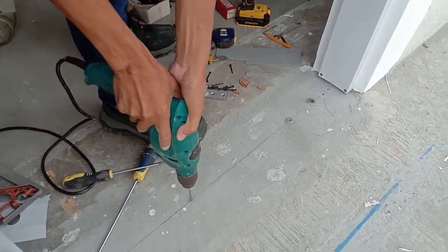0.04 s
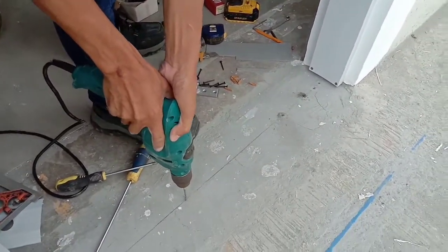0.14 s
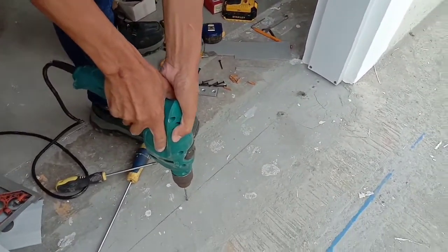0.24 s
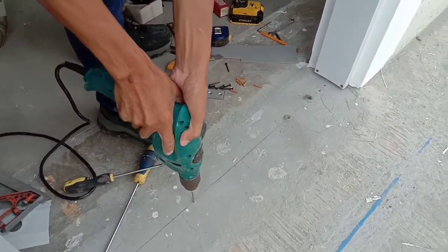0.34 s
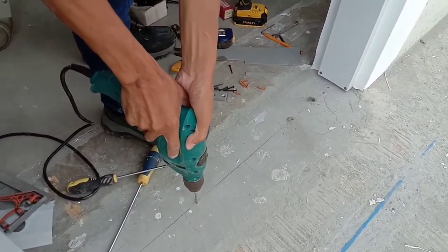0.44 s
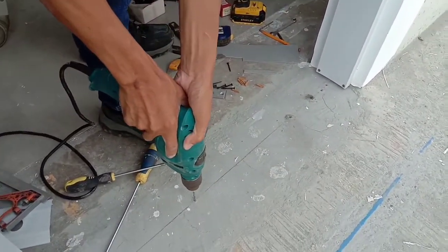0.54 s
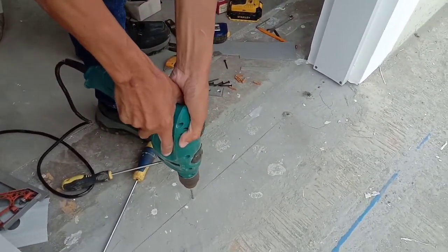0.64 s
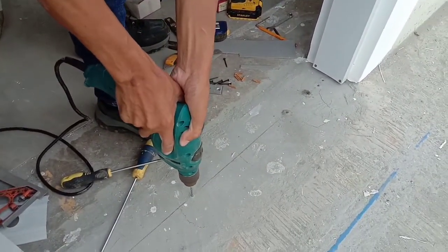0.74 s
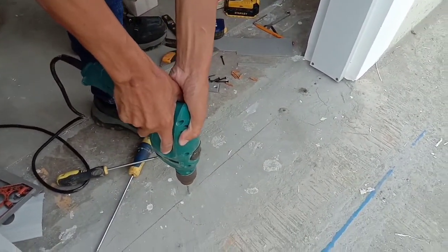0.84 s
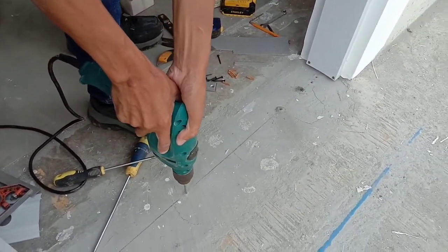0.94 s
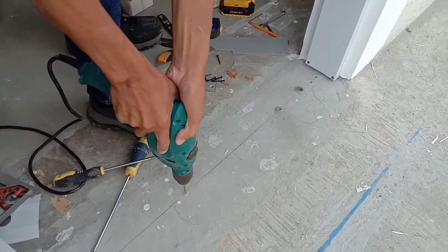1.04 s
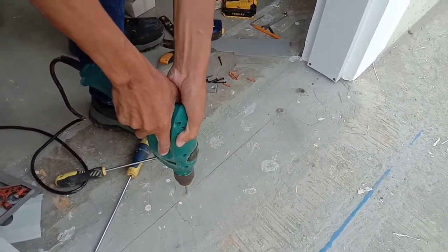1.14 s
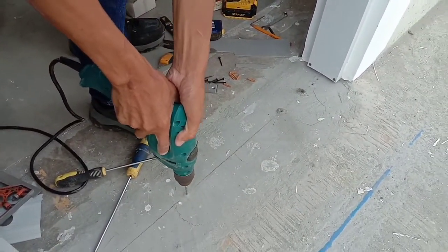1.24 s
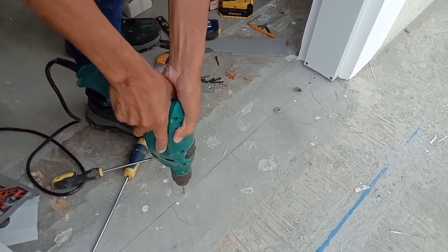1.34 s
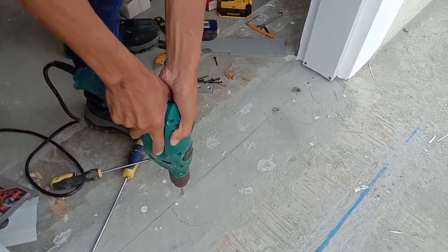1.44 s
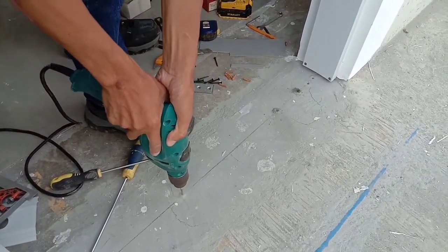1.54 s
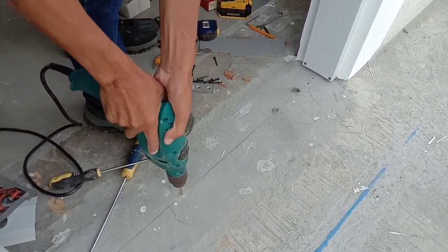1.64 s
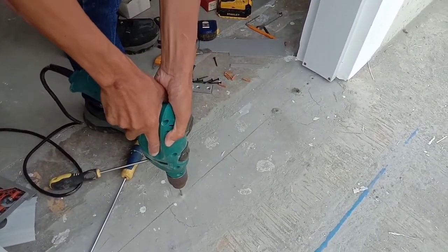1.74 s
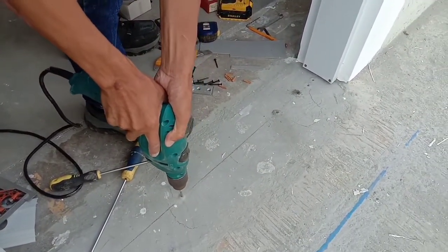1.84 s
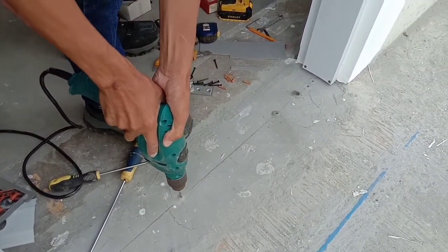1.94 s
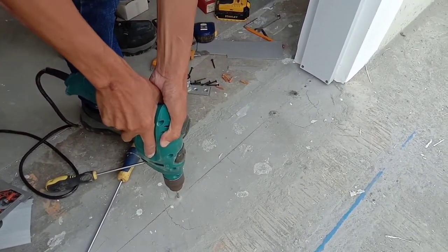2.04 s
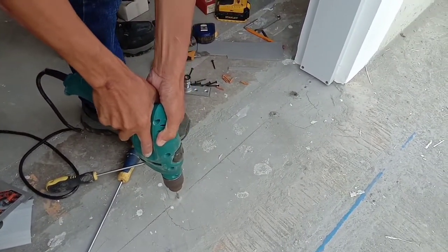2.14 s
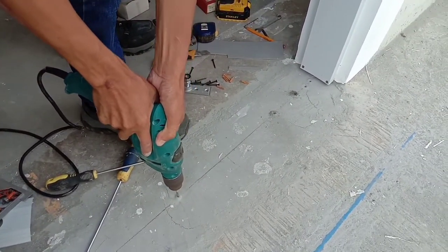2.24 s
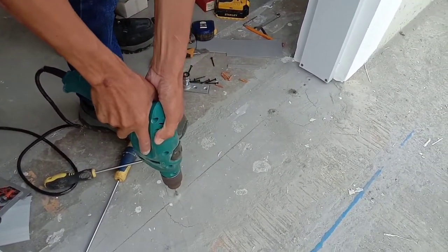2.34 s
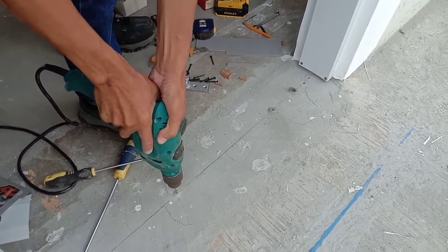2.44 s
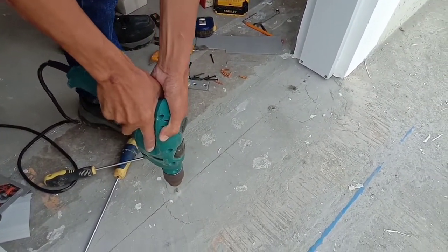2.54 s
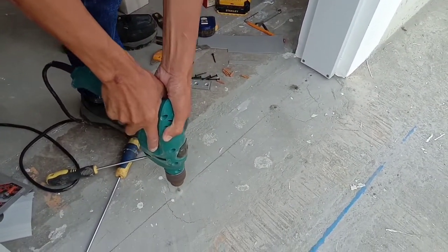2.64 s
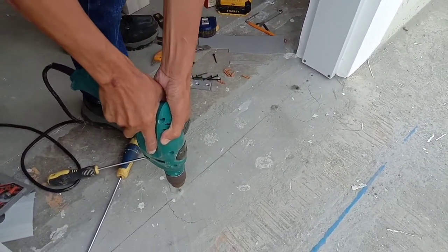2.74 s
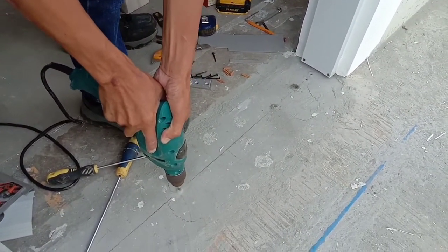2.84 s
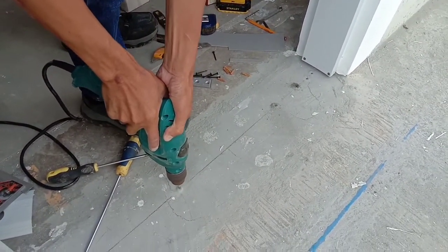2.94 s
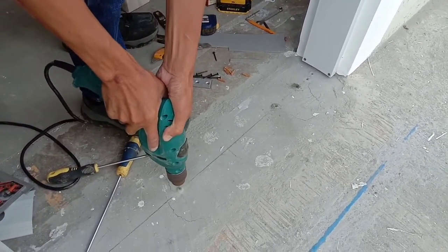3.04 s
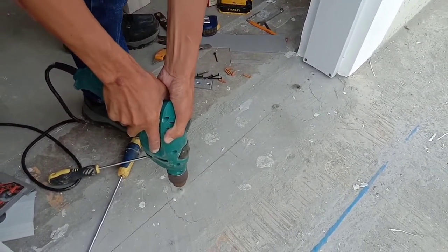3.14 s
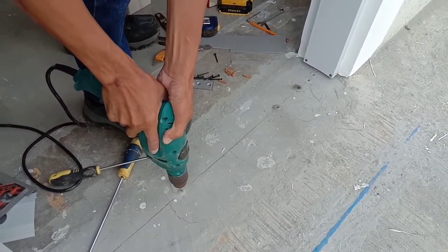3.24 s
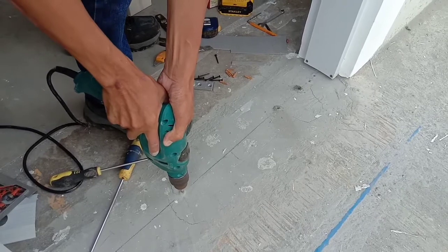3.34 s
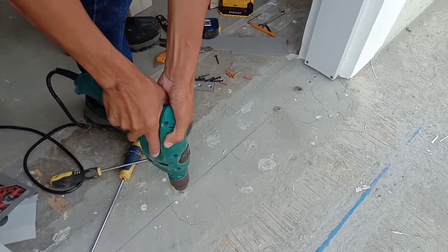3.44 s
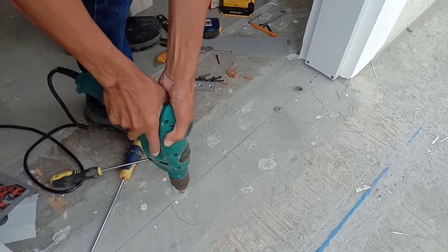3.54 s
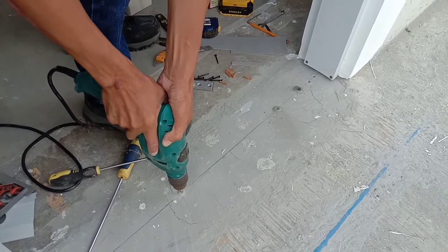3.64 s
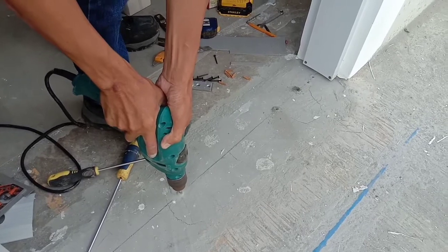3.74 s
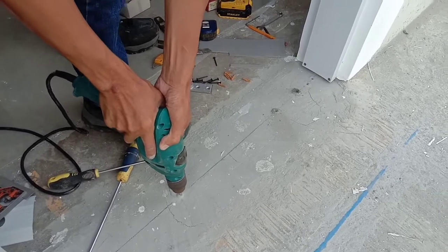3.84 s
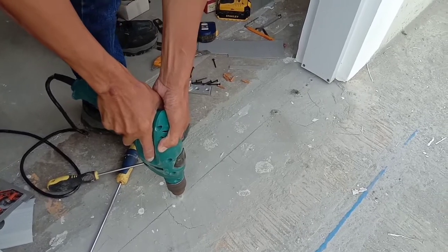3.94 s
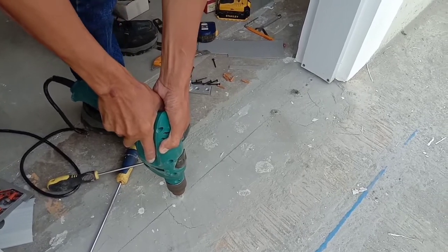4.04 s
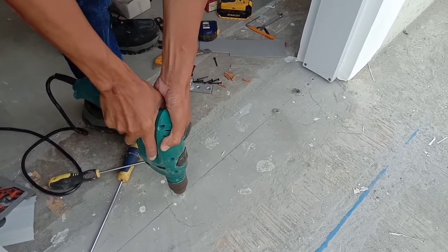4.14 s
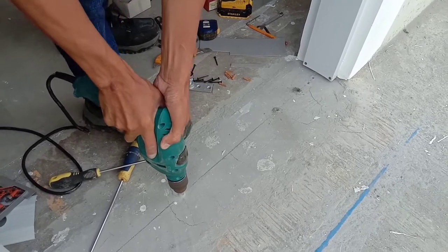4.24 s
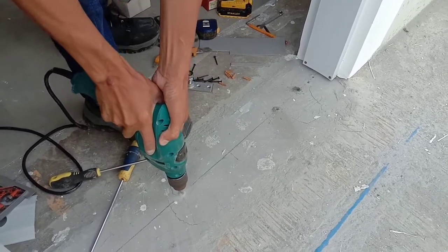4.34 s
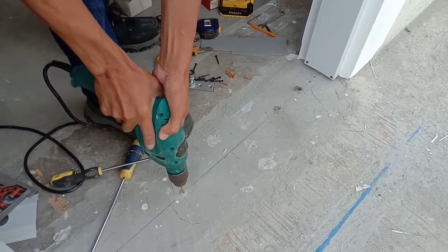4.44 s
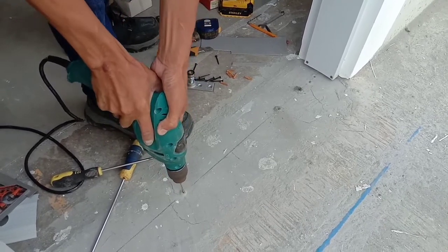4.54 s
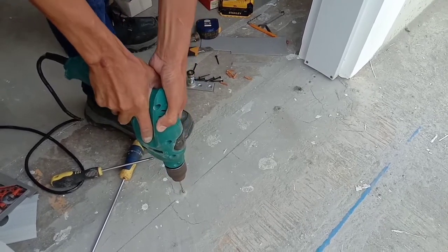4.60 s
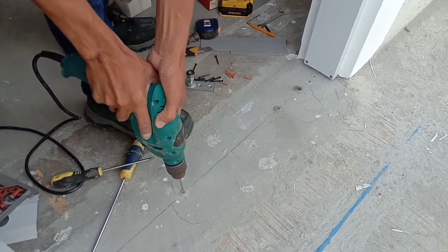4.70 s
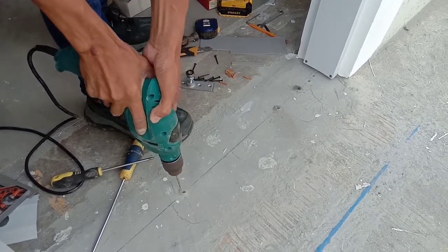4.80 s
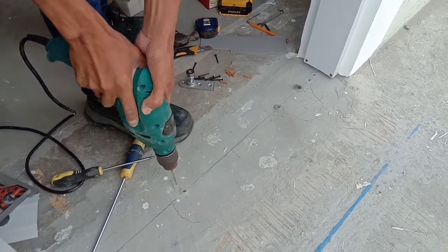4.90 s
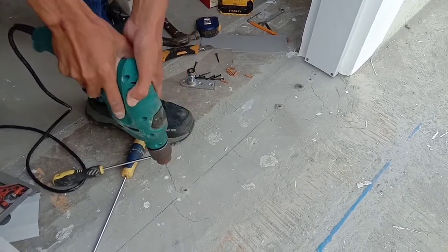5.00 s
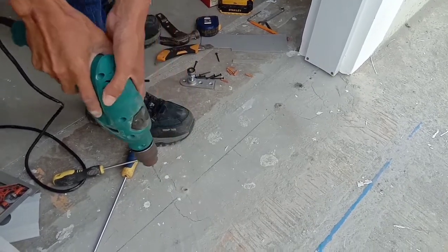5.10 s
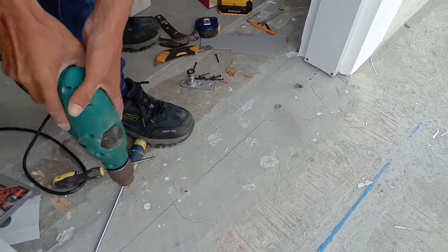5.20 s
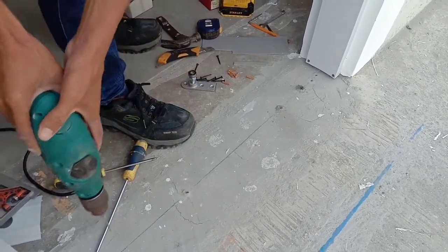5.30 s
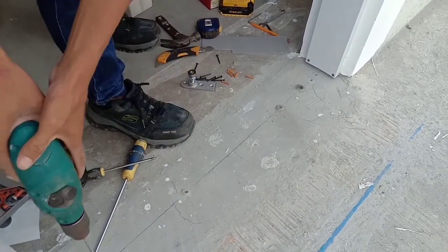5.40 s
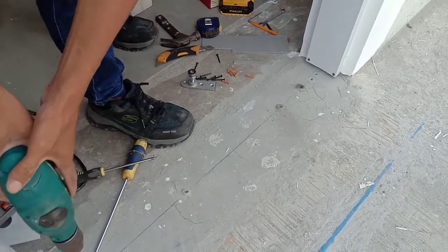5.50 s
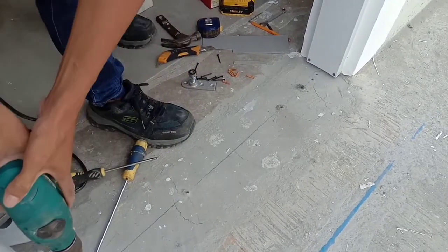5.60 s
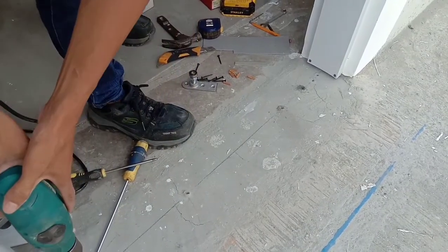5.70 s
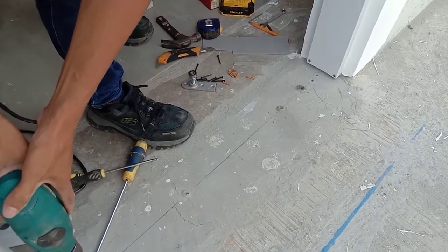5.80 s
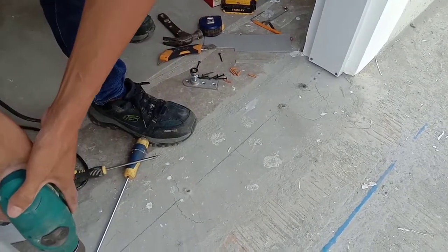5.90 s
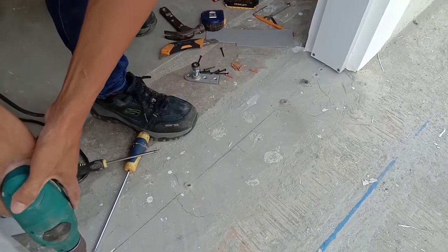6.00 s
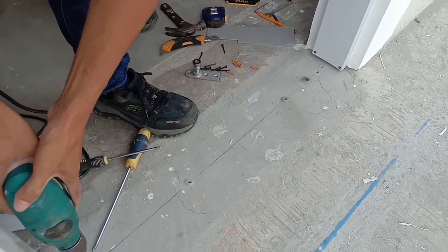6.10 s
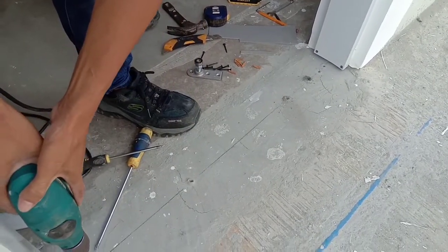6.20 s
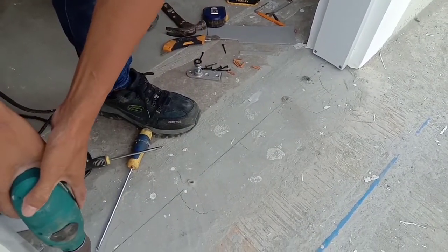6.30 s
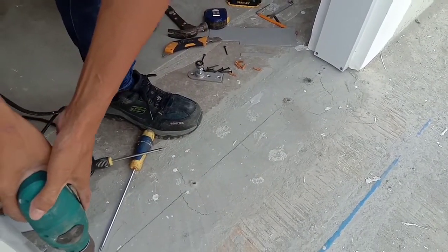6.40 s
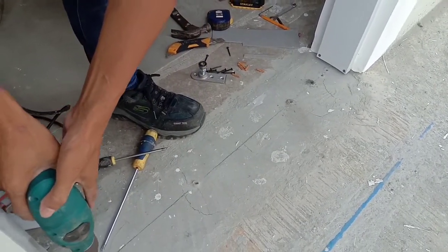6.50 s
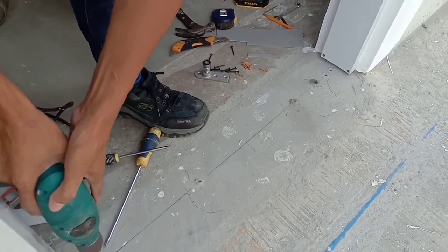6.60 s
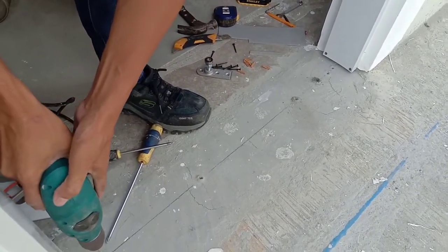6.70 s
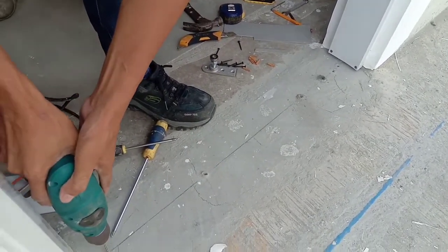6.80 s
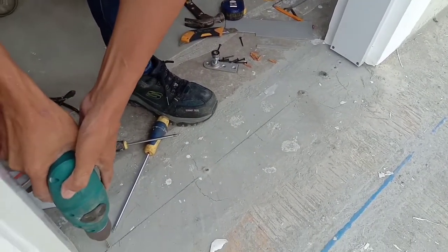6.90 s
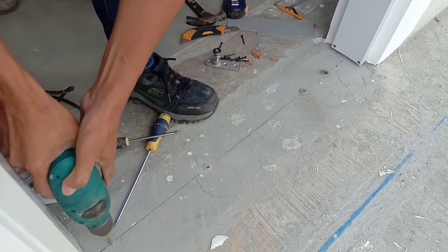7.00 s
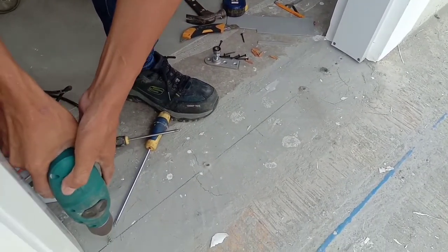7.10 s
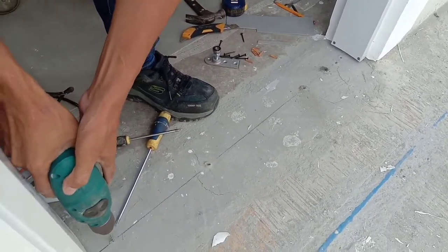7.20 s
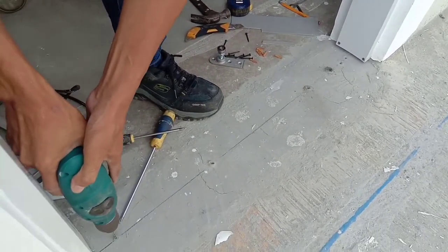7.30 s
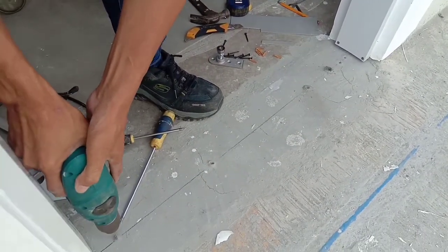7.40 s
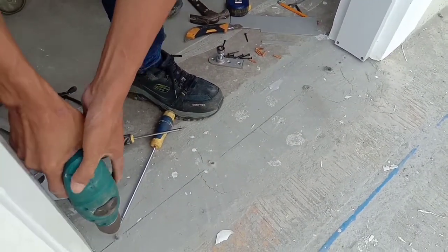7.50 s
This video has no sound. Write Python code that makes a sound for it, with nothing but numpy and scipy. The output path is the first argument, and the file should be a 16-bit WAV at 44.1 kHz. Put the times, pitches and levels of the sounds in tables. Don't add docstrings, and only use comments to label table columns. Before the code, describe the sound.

A hammer drill chews concrete with a rapid ratcheting roar, tonal whine and hissing grit. As it is pulled out, bright steel rings and a brief scrape give way to airy fan whistle gliding downward, with clattering chuck ticks and low thumping draught. It then bites again, stuttering at first before speeding up to full roar. Close mono sound, short hard-walled room echo.

```python
import sys
import numpy as np
from scipy import signal
from scipy.fft import rfft, irfft
from scipy.io import wavfile
from scipy.ndimage import uniform_filter1d

SR = 44100
rng = np.random.default_rng(int(sys.argv[2]) if len(sys.argv) > 2 else 0)


def master_out(mix):
    frames = np.transpose(np.atleast_2d(mix))
    ceiling = np.clip(frames, -1, 1)
    pcm = np.round(ceiling * 32767).astype(np.int16)
    wavfile.write(sys.argv[1], SR, pcm)


def voltage_ratio(decibels):
    exponent = np.asarray(decibels, float) / 20
    return 10 ** exponent


N = 332955


def evened(x):
    return x / np.sqrt(np.mean(x ** 2) + 1e-20)


def levelled(x):
    return x / np.sqrt(abs(uniform_filter1d(x ** 2, size=6000)) + 1e-12)


def read(points, x):
    at, value = np.transpose(points)
    return np.interp(x, at, value)


def curves(rows, t):
    s, *cols = np.transpose(rows)
    return [np.interp(t, s, c) for c in cols]


def columns(rows, early_s=0, late_s=0):
    first = max(round((rows[0][0] - early_s) * SR), 0)
    last = min(round((rows[-1][0] + late_s) * SR), N)
    return first, curves(rows, np.arange(first, last) / SR)


def coloured(x, points):
    hz, db = np.transpose(points)
    grid = abs(np.fft.fftfreq(4096, 1 / SR))
    gain_db = np.maximum(np.interp(np.log(grid + 1), np.log(hz), db), -100)
    log_gain = gain_db * np.log(10) / 20
    taps = np.fft.ifft(np.exp(np.conj(signal.hilbert(log_gain)))).real[:2048]
    return signal.oaconvolve(x, taps)[:len(x)]


def resonate(x, hz, width_hz):
    turn = np.exp(2j * np.pi * np.cumsum(hz * np.ones(x.shape[-1])) / SR)
    r = np.exp(-np.pi * width_hz / SR)
    return 2 * (turn * signal.lfilter([1 - r], [1, -r], x / turn)).real


def wander(count, hz):
    return evened(signal.lfilter(*signal.butter(2, hz, fs=SR), rng.standard_normal(count)))


def add(mix, at, sound):
    part = mix[at:][:len(sound)]
    part += sound[:len(part)]


def room(x, t60_s=.3):
    t = np.arange(SR // 3) / SR
    echoes = rng.choice([-1., 1.], len(t)) * (rng.random(len(t)) < 2000 / SR)
    tail = echoes * voltage_ratio(-60 * t / t60_s) * (t > .004)
    return signal.fftconvolve(x, tail / np.linalg.norm(tail))[:N]


# [f/Hz, level/dB]
BUFFET = [(15, -81), (25, -42), (43, -31), (73, 2), (92, 5), (155, 1.5), (413, -19), (512, -16.5),
          (600, -24), (780, -47), (1320, -120)]
# [t/s, peak level/dB, length/s]
GUSTS = [(0.077, -50, 0.045), (0.138, -49, 0.014), (0.16, -55, 0.014), (0.19, -40, 0.015),
         (0.256, -44.5, 0.015), (0.332, -46, 0.029), (0.398, -45, 0.012), (0.435, -55, 0.027),
         (0.916, -55, 0.018), (1.013, -52, 0.049), (1.111, -56, 0.041), (1.27, -54.7, 0.02),
         (1.328, -49, 0.023), (1.365, -55.9, 0.033), (1.431, -51, 0.023), (1.595, -60, 0.018),
         (1.683, -50, 0.032), (1.75, -50.5, 0.032), (1.943, -55, 0.026), (2.073, -49, 0.045),
         (2.904, -68, 0.042), (3.068, -58, 0.036), (3.231, -55, 0.029), (3.317, -63, 0.019),
         (3.693, -56, 0.026), (3.792, -63, 0.021), (3.841, -48, 0.045), (3.97, -56, 0.016),
         (4.077, -57, 0.023), (4.408, -52, 0.044), (4.5, -54.1, 0.03), (4.568, -40.5, 0.038),
         (4.738, -55, 0.031), (4.828, -53, 0.021), (5.005, -56, 0.034), (5.078, -57.3, 0.015),
         (5.333, -38.4, 0.045), (5.427, -47, 0.017), (5.457, -38.5, 0.017), (5.54, -34, 0.048),
         (5.568, -40, 0.011), (5.641, -42, 0.018), (5.68, -33, 0.011), (5.721, -34, 0.041),
         (5.824, -36.3, 0.017), (5.902, -38.5, 0.015), (5.94, -37.6, 0.011), (5.971, -36, 0.032),
         (6.055, -37.5, 0.027), (6.1, -47, 0.011), (6.152, -43, 0.021), (6.204, -36, 0.017),
         (6.235, -40, 0.028), (6.317, -41, 0.024), (6.395, -45, 0.014), (6.433, -46.5, 0.045),
         (6.635, -49.9, 0.018), (6.673, -50, 0.013), (6.82, -54.9, 0.016), (6.946, -49, 0.03)]
# [t/s, level/dB]
BREEZE = [(0.0, -54), (0.29, -55), (0.48, -71), (0.88, -83), (1.16, -63), (1.51, -67), (1.91, -60),
          (2.44, -83), (3.95, -67), (4.27, -80), (4.54, -66), (5.25, -62), (5.49, -49), (6.14, -42.5),
          (6.56, -60), (6.81, -52), (7.11, -77), (7.55, -76)]


def draught():
    t = np.arange(N) / SR
    coarse_t = t[::64]
    power = sum(voltage_ratio(2 * db - 25.2 * abs(coarse_t - s) / max(length_s, .008)) for s, db, length_s in GUSTS)
    air = coloured(rng.standard_normal(N), BUFFET)
    air_power = uniform_filter1d(uniform_filter1d(air ** 2, size=500), size=500)
    puffs = air / np.sqrt(abs(air_power) + 1e-12)
    bed = levelled(coloured(rng.standard_normal(N), BUFFET) * voltage_ratio(2.3 * wander(N, 22.0)))
    bed = coloured(rng.standard_normal(N), BUFFET) * voltage_ratio(2.3 * wander(N, 22.0))
    bed = levelled(bed) * voltage_ratio(read(BREEZE, t) - 1.5)
    return 0, np.interp(t, coarse_t, np.sqrt(power)) * puffs + bed


# [t/s, commutator whine f/Hz, vent level/dB at the microphone]
FAN = [
    (4.22, 9390, -46.5),
    (4.7, 9360, -41),
    (4.9, 9260, -40.5),
    (5.1, 8350, -39),
    (5.45, 6355, -35),
    (5.8, 4760, -37),
    (6.2, 3170, -40),
    (6.33, 2720, -43.5),
    (6.525, 2026, -42),
]
# [f/Hz, level/dB]
AIR = [(760, -30.5), (1300, -1.5), (1460, -7.5), (1870, -6.5), (2120, -10), (2450, -7.5), (2720, -11),
       (3040, -6), (3300, -9.5), (3790, -7.5), (4400, -9.5), (5960, -0.5), (7600, -12.5), (9880, -49),
       (16700, -120)]
AIR_SLOW = [(760, -57), (1300, 0), (1550, -19), (1720, -4.5), (2260, -6), (2660, -6.5), (3400, -7.5),
            (4150, -9), (5780, 4.5), (6270, -6), (7600, -16), (9880, -44), (16700, -120)]
# [f/Hz, level/dB]
FIZZ = [
    [(4410, -29), (7500, -7), (8330, -5), (10100, -5.5), (11600, -9.5), (12400, -14), (14900, -14),
     (15300, -24)],
    [(4410, -17), (7500, -2), (8010, -9), (8650, 0), (10400, -4), (11300, -3), (12500, -14), (15300, -20)],
]
# [f/Hz, level/dB]
VENT = [(150, -42), (250, -12), (345, -10), (576, 2.5), (723, 1), (971, 7), (1310, -1), (1450, -10),
        (1570, -5), (2000, -8), (2600, -83), (4400, -120)]
FREE_HZ, AIR_DB, FIZZ_DB = 9900, -35, -51
AIR_LAW, VENT_LAW, FIZZ_LAW = 1.4, 1.36, 1.37
HOUSING_HZ, HOUSING_DB = 5810, -47


def airflow():
    at, (hz, aim_db) = columns(FAN, early_s=.07, late_s=0.0042)
    size = len(hz)
    t = np.arange(size) / SR
    speed_db = 20 * np.log10(hz / FREE_HZ)
    rattle = voltage_ratio(1.9 * np.minimum(rng.exponential(1, size), 5))
    rattle *= (rng.random(size) < 900 / SR) * rng.choice([-1, 1], size)
    drive = rng.standard_normal(size) + 0.69 * evened(rattle)
    slowing = np.clip((t + at / SR - 5.1) / 1.25, 0, 1)

    def darkening(fast, slow):
        return levelled((1 - slowing) * evened(coloured(drive, fast)) + slowing * evened(coloured(drive, slow)))

    sound = voltage_ratio(AIR_DB + AIR_LAW * speed_db) * darkening(AIR, AIR_SLOW)
    sound += voltage_ratio(FIZZ_DB + FIZZ_LAW * speed_db) * darkening(*FIZZ)
    vent = levelled(coloured(rng.standard_normal(size), VENT)) * voltage_ratio(0.69 * wander(size, 8.0))
    sound += voltage_ratio(aim_db + VENT_LAW * speed_db) * vent
    sing_hz = uniform_filter1d(np.minimum(HOUSING_HZ, 2.04 * hz), size=3000)
    song = levelled(resonate(resonate(drive, sing_hz, 260), sing_hz, 260))
    sound += voltage_ratio(HOUSING_DB) * slowing ** 1.8 * np.clip(sing_hz / HOUSING_HZ, 0, 1) ** 6.5 * song
    return at, voltage_ratio(wander(size, 21)) * sound * np.minimum(t / 0.16, 1) * signal.windows.tukey(size, .005)


# [whine f/Hz, level/dB]
WHINE_CASE = [(2000, -54), (3200, -50), (4150, -54), (4800, -44), (7350, -39.5), (7650, -62), (9000, -65),
              (9310, -55.5), (9470, -60)]
# [whine f/Hz, level/dB]
OTHERS = [(2000, -62), (2700, -60), (3300, -56), (4800, -57), (6300, -55), (7400, -44.5), (8300, -45),
          (9000, -53), (9400, -59)]
# [shaft multiple, level/dB]
ROTOR = [(7, -10), (9, -10), (14, -10), (18, -9), (19, -11), (22, -1), (23, -11), (26, -9), (30, -9),
         (34, -8), (36, -11), (38, -11), (44.4, -13), (46, -14), (48, -8), (49, -7), (72, -10)]
SEGMENTS = 24
NEXT_DB, BRUSH_DB, BRUSH_LAW = -66.5, -47.5, .5


def whistle():
    at, (hz, _) = columns(FAN)
    size = len(hz)
    others_db = read(OTHERS, hz)
    shaft_hz = uniform_filter1d(hz, size=3000) / SEGMENTS
    turns = np.cumsum(shaft_hz * (1 + 0.00137 * wander(size, 29.0))) / SR
    whine_phase = 2 * np.pi * SEGMENTS * turns + .55 * wander(size, 60)
    tones = voltage_ratio(read(WHINE_CASE, hz) + 2.5 * wander(size, 40)) * np.sin(whine_phase)
    tones += voltage_ratio(NEXT_DB + 4.8 * wander(size, 25)) * np.sin(2 * np.pi * (SEGMENTS + 1) * turns)
    for k, rel_db in ROTOR:
        muffle_db = np.interp(k * shaft_hz, [7000, 8200, 13000, 15000], [0, -9, -15, -90])
        level = voltage_ratio(others_db + rel_db + muffle_db + 2.5 * wander(size, 25))
        tones += level * np.sin(2 * np.pi * k * turns + .8 * wander(size, 40))
    comb = np.zeros(size)
    for k in range(4, 68):
        level = voltage_ratio(2.1 * rng.standard_normal() + 5.1 * wander(size, 8.3)) * (k * shaft_hz < 8500)
        comb += level * np.sin(2 * np.pi * (k * turns + rng.random()))
    tones += voltage_ratio(BRUSH_DB) * (hz / FREE_HZ) ** BRUSH_LAW * levelled(coloured(comb, AIR_SLOW))
    onset = np.clip((np.arange(size) / SR - .2) / 0.29, .25, 1)
    return at, np.sqrt(2) * tones * onset * signal.windows.tukey(size, .01)


def ping(s, db, hz, t60_s, spread, count):
    t = np.arange(round(max(.12, .6 * t60_s) * SR)) / SR
    places = np.linspace(-1, 1, count) + rng.uniform(-0.54, 0.9, count) / count
    partials = sum(np.sin(2 * np.pi * (hz * (1 + spread * k) * t + k)) for k in places)
    return round(s * SR), voltage_ratio(db - 60 * t / t60_s) * np.minimum(t / 0.0009, 1) * partials / np.sqrt(count)


# [t/s, peak level/dB, f/Hz]
KNOCKS = [(5.4874, -35, 2300), (5.6146, -29, 2120), (5.7543, -33, 2890), (5.8057, -35, 2150),
          (5.831, -31, 3170), (5.8591, -36, 3220), (5.879, -32, 2980), (5.9294, -32, 3200),
          (5.9469, -34, 2820), (5.99, -30.5, 3300), (6.012, -36, 3000), (6.0372, -33, 3120),
          (6.057, -31, 3160), (6.09, -37, 3100), (6.131, -31, 3300), (6.1792, -34, 3210),
          (6.204, -29.5, 3000)]


def chuck_knocks(mix):
    for s, db, hz in KNOCKS:
        add(mix, *ping(s, db, .9 * hz, 0.024, spread=0.222, count=10))
        add(mix, *ping(s, db - 7, 6700, 0.018, spread=0.11, count=8))


# [t/s, peak level/dB, f/Hz, t60/s]
PINGS = [(4.22, -36, 1930, .5), (4.23, -47, 640, .5), (4.249, -44, 11500, 0.033), (4.267, -40, 11300, 0.05),
         (4.291, -40, 11300, 0.08), (4.316, -39, 11200, .035), (4.313, -26, 3760, 0.035),
         (4.338, -28, 4000, 0.035), (4.342, -41, 8000, .04), (4.344, -45, 11200, .03),
         (4.383, -28, 5500, .03), (4.384, -45, 11100, .03), (4.408, -24, 5100, .035),
         (4.424, -39, 10900, .06), (4.452, -46, 11400, .05), (4.549, -41, 11500, .07),
         (4.553, -33, 3900, .04)]


def bit_pings(mix):
    for s, db, hz, t60_s in PINGS:
        spread, count = (0.037, 7) if hz > 7000 else (.02, 4)
        add(mix, *ping(s, db, hz, t60_s, spread, count))


# [f/Hz, width/Hz, level/dB]
SCRAPE = [
    (9500, 530, 1),
    (11100, 900, 3),
]


def scrape():
    start_s, end_s, level_db = 4.25, 4.47, -57.5
    size = round((end_s - start_s) * SR)
    noise = rng.standard_normal(size) * voltage_ratio(3.1 * wander(size, 45))
    hiss = sum(voltage_ratio(db) * evened(resonate(resonate(noise, hz, width), hz, width)) for hz, width, db in SCRAPE)
    return round(start_s * SR), voltage_ratio(level_db) * signal.windows.tukey(size, .3) * hiss


# [t/s, force level/dB]
KICKS = [(6.523, -5), (6.5335, -3.5), (6.54, -1), (6.549, -4), (6.5559, -1.5), (6.5655, -11),
         (6.5719, -6.3), (6.5821, -4), (6.587, -6), (6.5982, -2), (6.6062, -4.5), (6.615, -4),
         (6.623, -9.5), (6.6326, -3), (6.643, -3.2), (6.652, 0), (6.6612, -4), (6.67, -1), (6.6793, -2),
         (6.6894, -1.5), (6.6982, -3), (6.7073, -1), (6.7153, -3.5), (6.724, -6), (6.733, -6), (6.7428, -7),
         (6.7498, -4), (6.759, -2), (6.7668, -4), (6.7747, -5), (6.782, -3), (6.7901, 4)]
TEETH = 16


def blows(at, turns, wear):
    tooth = np.arange(int(turns[0]) + 1, int(turns[-1]))
    luck = rng.standard_normal((len(tooth), 2))
    blows_hz = np.interp(tooth, turns, np.gradient(turns) * SR)
    slack = np.clip(630 / blows_hz, 1, 4) ** 1.4
    late = 0.0211 * wear[tooth % TEETH, 0] + 0.00818 * slack * luck[:, 0]
    force_db = 3.5 * wear[tooth % TEETH, 1] + 1.86 * np.cos(2 * np.pi * tooth / TEETH)
    force_db = force_db / np.sqrt(slack) + 0.1 * luck[:, 1]
    place = np.interp(tooth + late, turns, np.arange(len(turns)))
    kick_s, kick_db = np.transpose(KICKS)
    if kick_s[0] * SR > at > 0:
        keep = place + at > (kick_s[-1] + .005) * SR
        place = np.r_[kick_s * SR - at, place[keep]]
        force_db = np.r_[kick_db + 3.5, force_db[keep]]
    near = np.floor(place).astype(int)[:, None] + np.arange(-8, 9)
    near = np.clip(near, 0, len(turns) - 1)
    off = near - place[:, None]
    sharp = np.zeros(len(turns))
    np.add.at(sharp, near, voltage_ratio(force_db)[:, None] * np.sinc(off) * np.cos(np.pi * off / 20) ** 2)
    return sharp


def smeared(x):
    burst = rng.standard_normal(1024) * np.exp(-np.arange(1024) / SR / 0.0028)
    return signal.oaconvolve(x, irfft(np.exp(1j * np.angle(rfft(burst)))))[:len(x)]


def without_lines(x, turns):
    spins = np.exp(2j * np.pi * np.arange(1, 12)[:, None] * turns)
    means = signal.oaconvolve(x / spins, np.full((1, 2000), 1 / 2000), "same")
    return x - 2 * (spins * means).real.sum(0)


SOFT_BELOW_HZ = 420


def crushing(sharp, hz):
    t = np.arange(1500) / SR
    fade = np.exp(-t / .004) * np.minimum(np.arange(1500) / 55, 1)
    crumble = levelled(signal.oaconvolve(abs(sharp), fade)[:len(hz)])
    grind = .3 * np.clip(hz / SOFT_BELOW_HZ, 0, 1) ** 0.69
    crush = levelled((crumble + grind) * rng.standard_normal(len(hz)))
    return crush * (1 + 0.068 * np.cos(2 * np.pi * 120 * np.arange(len(hz)) / SR))


# [f/Hz, level/dB]
TOP = [(4120, -19), (7000, -2.5), (7400, 3), (8060, -8), (8800, -3.5), (9710, -2.5), (13200, -13),
       (15300, -21)]
# [f/Hz, width/Hz, level/dB]
GRIT_RINGS = [(8250, 350, -3.5), (9680, 450, -3.5), (11000, 450, -3.5), (12600, 500, -3)]


def grit_spray(strike, crush, hz, turns, depth):
    size = len(hz)
    chips = voltage_ratio(2.3 * np.minimum(rng.exponential(1, size), 6)) * (rng.random(size) < 2500 / SR)
    grit = levelled(coloured(crush + .5 * strike + .5 * evened(chips) * crush, TOP))
    grit = levelled(grit + sum(voltage_ratio(db) * resonate(grit, f, width) for f, width, db in GRIT_RINGS))
    flakes = voltage_ratio(3.6 * np.minimum(rng.exponential(1, size), 3)) * (rng.random(size) < 35 / SR)
    grit *= 1 + .3 * signal.lfilter([1], [1, -np.exp(-1 / (0.003 * SR))], flakes)
    throw = np.exp(-((turns / TEETH + .22) % 1) / .35) - 0.34
    return grit * voltage_ratio(4.2 * depth * (hz / 650) ** 2 * 2.8 * throw)


def ring_lines(turns, hz, ring_hz, width_hz, orders):
    lines = np.zeros(len(hz))
    for k in orders:
        lift = 1 / (1 + ((k * hz / TEETH - ring_hz) / width_hz) ** 2)
        lines += voltage_ratio(2.1 * wander(len(hz), 5.5)) * lift * np.sin(2 * np.pi * (k * turns / TEETH + rng.random()))
    return lines


# [chuck multiple, level/dB]
UPPER = [(60, -10.5), (63, -3), (64, 0.5), (65, -4), (76, 2), (79, -5.5), (80, 4), (81, -5), (95, -2),
         (96, -7), (97, -2.5), (111, 0.5), (112, -5.5), (127, -7), (128, 2)]
# [f/Hz, level/dB]
UPPER_CASE = [(2300, -3), (2390, -6.5), (2450, -16), (2650, -6.5), (2900, -14), (3060, -7.5), (3250, -10.5),
              (3450, -10.5), (3680, -5.5), (3900, -12), (4080, -42), (4230, -5), (4500, -8), (4700, -19),
              (4880, -6.5), (5400, -17)]
SIDE_DB, SIDE_FALL_DB, SIDE_SWAY_DB = -20.5, 4.5, 4.5


def ratchet_lines(turns, hz, line_db, seated_db, swing, case_hz, bit_hz, pure_db):
    size = len(hz)
    lines = np.zeros(size)
    for k, sway_db in enumerate([.8, 1.2, .8], 1):
        level = voltage_ratio(line_db[k - 1] + sway_db * wander(size, 4.6)) * swing ** (1.9 * (k - 1))
        lines += level * np.sin(2 * np.pi * k * turns)
    for k, lift_db in enumerate([0, 8, 6], 1):
        side_db = uniform_filter1d(line_db[k - 1], size=15000) + SIDE_DB + lift_db
        for off in (-2.5, -3, -1, 0, 2):
            level = voltage_ratio(side_db - SIDE_FALL_DB * abs(off) + SIDE_SWAY_DB * wander(size, 2.1))
            lines += level * np.sin(2 * np.pi * ((k + off / TEETH) * turns + rng.random()))
    for k, rel_db in UPPER:
        case_db = read(UPPER_CASE, k * hz / TEETH)
        level = voltage_ratio(seated_db + rel_db + case_db + 1.0 + 1.8 * wander(size, 2.8))
        lines += level * np.sin(2 * np.pi * k * turns / TEETH + 0.12 * wander(size, 27))
    lines += voltage_ratio(seated_db + pure_db) * ring_lines(turns, hz, bit_hz, 140, range(124, 153))
    lines += voltage_ratio(seated_db - 12) * ring_lines(turns, hz, case_hz, 120, (47, 49, 50, 51, 52, 53))
    return np.sqrt(2) * swing * lines


# [t/s, blow rate f/Hz, blow level/dB, ratchet seating level/dB]
BORES = [
    [(0.0, 292, -32.5, -28), (0.17, 404, -32, -33), (0.52, 606, -31, -19.5), (0.72, 667, -30, -22),
     (0.89, 684, -29, -16.5), (1.07, 680, -28, -14), (1.49, 650, -27.5, -12.5), (1.98, 609, -26, -13),
     (2.37, 598, -26.5, -12), (2.62, 594, -28, -10), (2.69, 577, -27, -14), (2.78, 584, -27.5, -12),
     (2.97, 613, -27, -12), (3.45, 619, -26, -11), (3.9, 604, -27, -10.5), (4.14, 622, -28, -13.5),
     (4.195, 632, -29.5, -19.5), (4.26, 590, -43, -25)],
    [(6.54, 140, -36, -44), (6.828, 200, -33.5, -26), (6.92, 254, -31, -23), (7.014, 435, -31, -24.5),
     (7.108, 540, -31.5, -23), (7.2, 594, -30, -20), (7.32, 630, -29, -22), (7.428, 642, -28, -14),
     (7.55, 654, -28.5, -16)],
]
# [f/Hz, level/dB]
SHALLOW = [
    [(150, -61), (250, -27.5), (500, -7), (820, -11), (1100, -4.5), (1500, -9), (2150, 2), (2600, -0.5),
     (3100, -1.5), (4350, -2.5), (5570, 0.5), (6900, -0.5), (8000, -38.5), (10400, -41.5)],
    [(150, -57), (250, -26), (500, -15), (750, -5.5), (1000, 2.5), (1400, -2), (1800, -2), (2400, 0.5),
     (3100, 2), (4350, -1.5), (5570, -4.5), (6900, -2.5), (8000, -43), (10400, -43)],
]
# [f/Hz, level/dB]
DEEP = [(150, 6), (250, -26.5), (500, -6), (860, -19.5), (1210, -25), (1550, -8), (1900, -7), (2300, -12),
        (3300, -2), (4050, 1), (5570, 3), (7120, -5.5), (8000, -15), (10400, -49.5)]
# [f/Hz, width/Hz, level/dB]
RINGS = [(3006, 180, -2), (4300, 670, -48), (6120, 200, -6.5), (7150, 410, -1)]
# [f/Hz, level/dB]
GRIP = [
    [(300, 1), (610, 0), (690, 0)],
    [(600, 0), (650, 1.5)],
]
# [t/s, case f/Hz, bit f/Hz, bit purity level/dB]
TUNING = [
    [(0, 2040, 5580, -10), (.6, 2160, 5480, -23), (1.1, 2083, 5370, -11), (1.6, 1920, 5784, -19),
     (2.1, 1890, 5600, -18), (2.55, 1942, 5460, -7.5), (2.9, 1920, 5430, -11), (3.4, 1951, 5610, -4.5),
     (3.8, 1957, 5672, -17), (4.2, 1956, 5470, -12)],
    [(6.52, 1855, 5630, -14), (7.0, 1880, 5750, -24), (7.55, 1930, 5900, -32)],
]
# [t/s, second line level/dB, third line level/dB]
OVERTONES = [
    [(.3, -63, -64), (.7, -55, -42), (.82, -56, -38), (.95, -50, -45), (1.2, -47, -31.5), (1.3, -47, -40),
     (1.4, -50, -33), (1.5, -52, -35), (1.62, -44, -32.5), (1.8, -49, -37), (2.05, -47, -39),
     (2.55, -53, -41.5), (2.8, -51.5, -45.5), (3.0, -48, -39), (3.35, -53, -36.5), (3.6, -53, -36),
     (3.82, -46, -42.5), (4.1, -48.5, -34.5), (4.26, -67, -56)],
    [(6.8, -81, -90), (6.95, -57, -64), (7.05, -50, -62), (7.15, -41.5, -46), (7.3, -47, -42),
     (7.42, -39.5, -45), (7.55, -43, -46)],
]
LEAD_TEETH = [2, 9]
START_DEPTH, END_DEPTH, SINK_PER_S = 0.24, 0.57, [0.13, 0.41]
FULL_BLOWS_HZ, GRIT_DB, GRIT_SLOW_DB = 600, -15.5, -6.5


def hammer(rows, shallow, sink_per_s, grip, tuning, overtones, lead, wear):
    at, (hz, db, seat_db) = columns(rows, early_s=.018)
    size = len(hz)
    t = (at + np.arange(size)) / SR
    depth = np.clip(START_DEPTH + sink_per_s * np.arange(size) / SR, 0, END_DEPTH)
    case_hz, bit_hz, pure_db = curves(tuning, t)
    unsteady_hz = uniform_filter1d(hz, size=2500) * (1 + .0015 * wander(size, 12.18))
    turns = lead + .97 + np.cumsum(unsteady_hz) / SR
    sharp = blows(at, turns, wear)
    crush = crushing(sharp, hz)
    strike = without_lines(levelled(smeared(sharp)), turns) * np.clip(hz / SOFT_BELOW_HZ, .08, 1)

    both = np.array([strike, crush])
    rings = [(case_hz, 200, 0), (bit_hz, 130, 7.5 + 0.5 * pure_db)]
    for f, width, ring_db in RINGS:
        rings.append((f * (1 + .015 * wander(size, 1.5)), width, ring_db))
    rung = both + sum(voltage_ratio(ring_db) * resonate(both, f, width) for f, width, ring_db in rings)
    loose = evened(coloured(0.49 * rung[0] + rung[1], shallow))
    guided = evened(coloured(1.47 * rung[0] + rung[1], DEEP))

    grit = grit_spray(strike, crush, hz, turns, depth)
    grit_db = GRIT_DB + GRIT_SLOW_DB * np.maximum(1 - hz / FULL_BLOWS_HZ, 0)
    flicker = voltage_ratio(0.5 * wander(size, 6.1))
    sound = voltage_ratio(db) * levelled((1 - depth) * loose + depth * guided) + voltage_ratio(db + grit_db) * grit
    sound *= flicker * signal.windows.tukey(size, .001)

    swing = 1 + 0.042 * np.cos(2 * np.pi * turns / TEETH)
    line_db = [db + seat_db + read(grip, hz), *curves(overtones, t)]
    return at, sound, ratchet_lines(turns, hz, line_db, db + seat_db, swing, case_hz, bit_hz, pure_db)


def scene():
    drill, tones = np.zeros(N), np.zeros(N)
    wear = rng.standard_normal((TEETH, 2))
    add(drill, *airflow())
    add(tones, *whistle())
    chuck_knocks(drill)
    bit_pings(drill)
    add(drill, *scrape())
    for bore in zip(BORES, SHALLOW, SINK_PER_S, GRIP, TUNING, OVERTONES, LEAD_TEETH):
        at, sound, lines = hammer(*bore, wear)
        add(drill, at, sound)
        add(tones, at, lines)
    mix = drill + tones + voltage_ratio(-10.5) * room(drill)
    ceiling = .21
    low_cut = signal.butter(4, 300, "high", fs=SR, output="sos")
    mix = signal.sosfilt(low_cut, ceiling * np.tanh(mix / ceiling))
    add(mix, *draught())
    return np.array([mix, mix])


def low_pass(x):
    return signal.sosfilt(signal.butter(12, 15450, fs=SR, output="sos"), x)


def record(dry):
    lifted = dry + 2.5 * resonate(dry, 15350, 200)
    return low_pass(lifted)


dry = scene()
out = record(dry)
master_out(out)
```